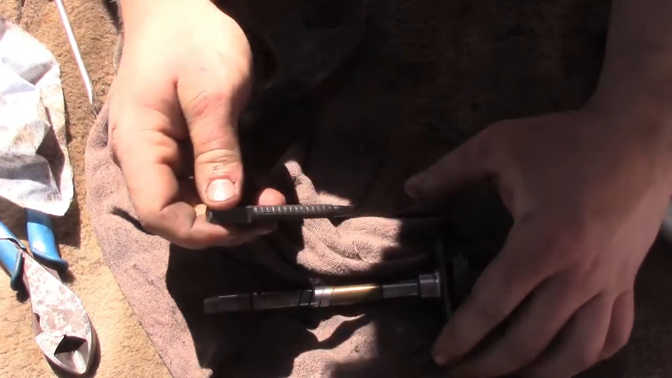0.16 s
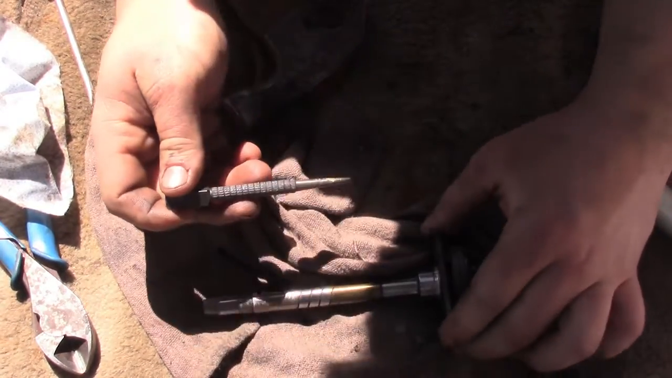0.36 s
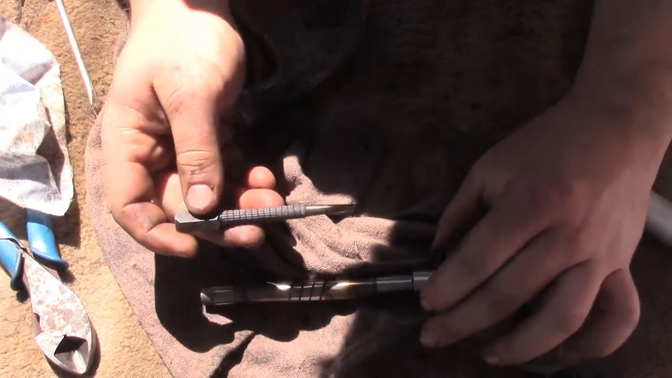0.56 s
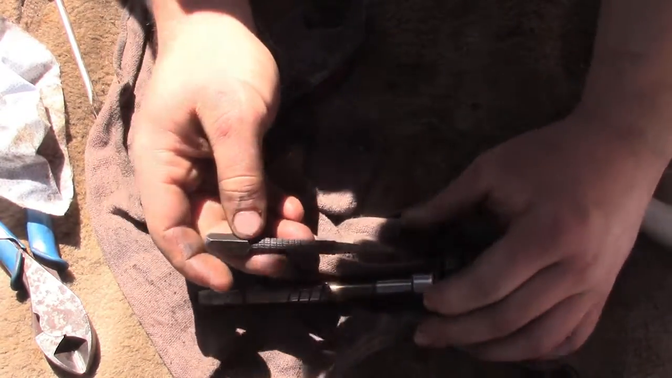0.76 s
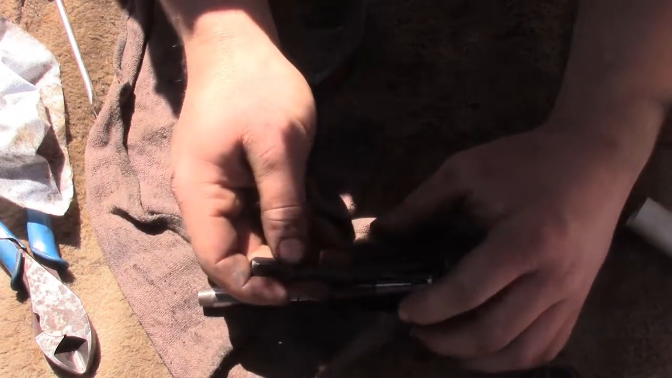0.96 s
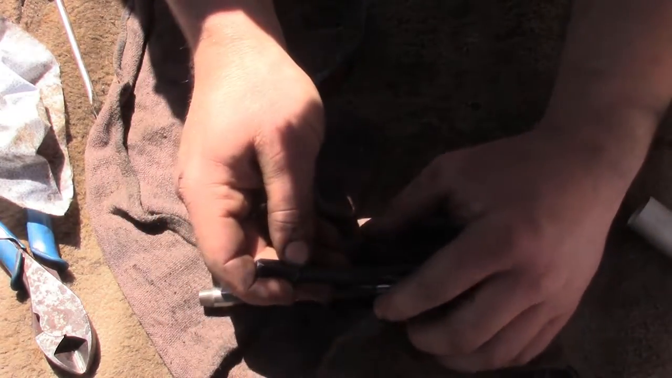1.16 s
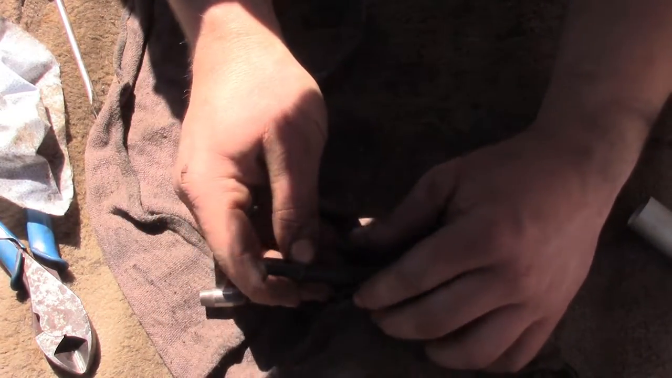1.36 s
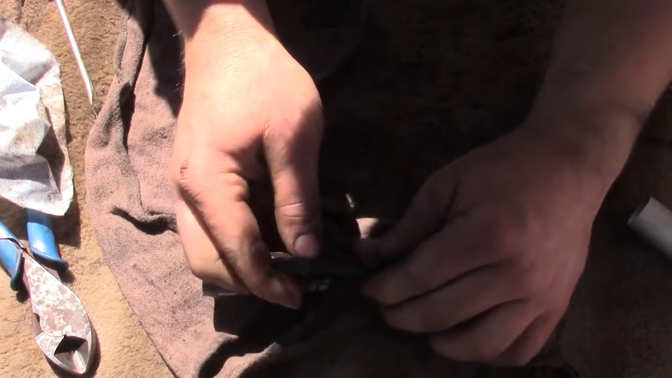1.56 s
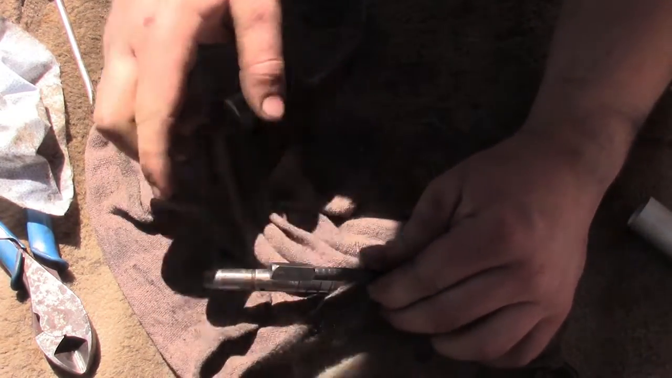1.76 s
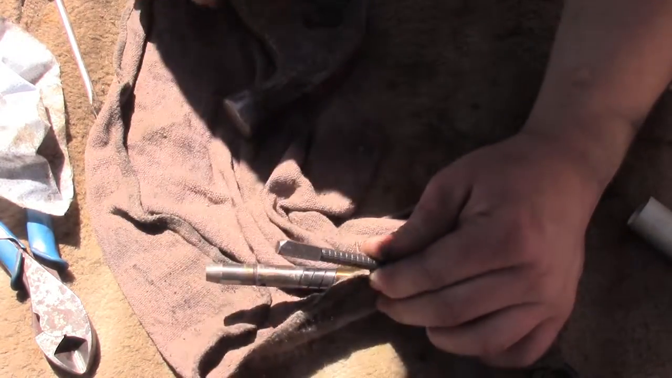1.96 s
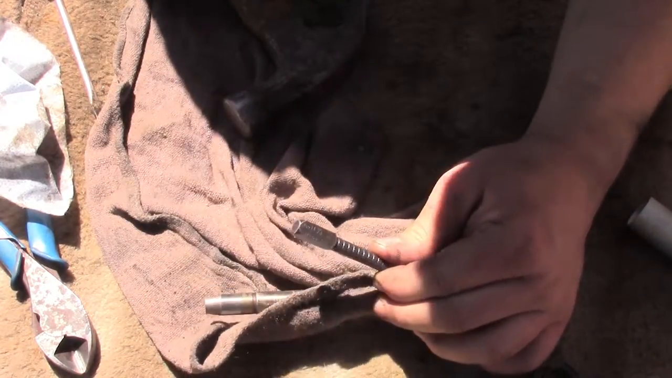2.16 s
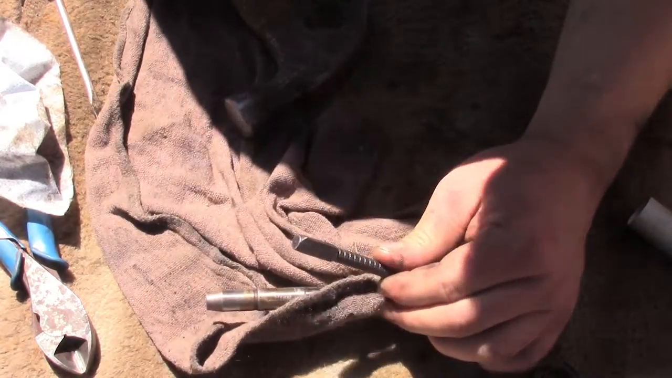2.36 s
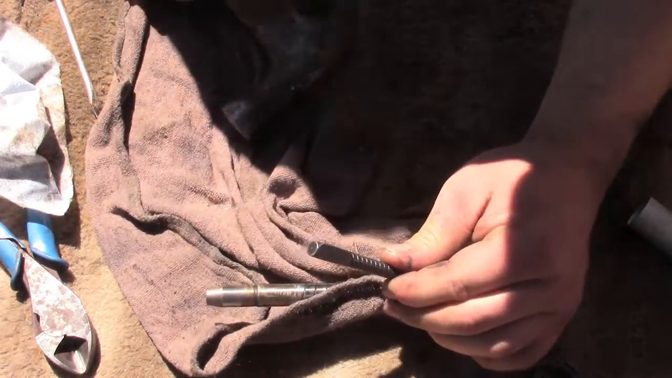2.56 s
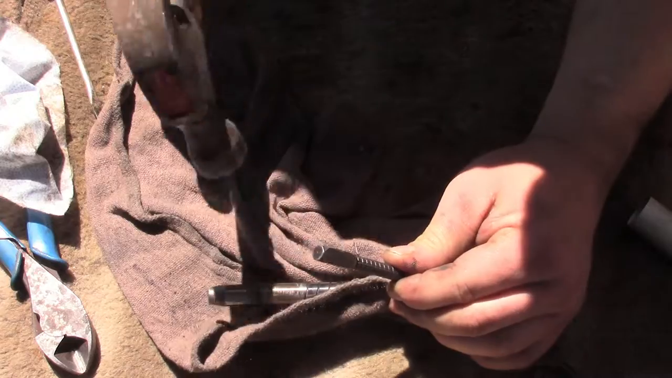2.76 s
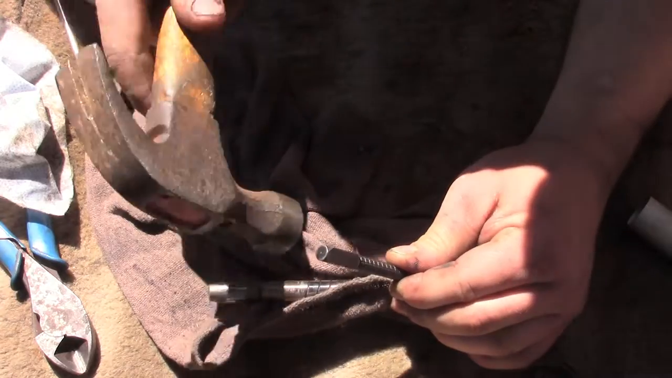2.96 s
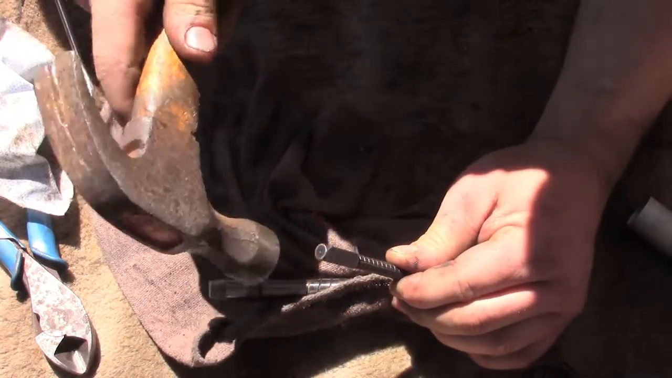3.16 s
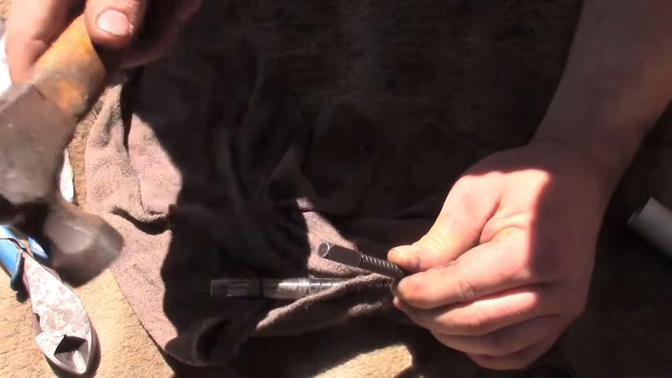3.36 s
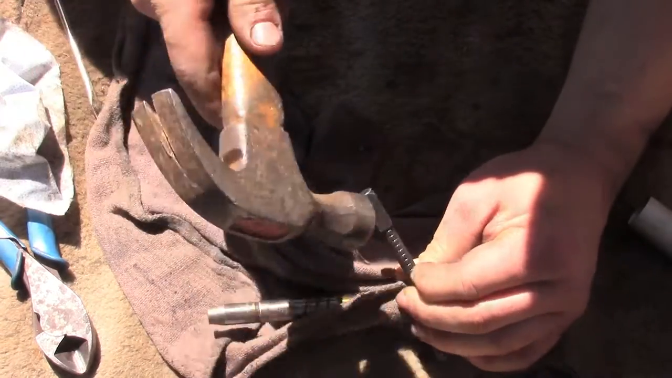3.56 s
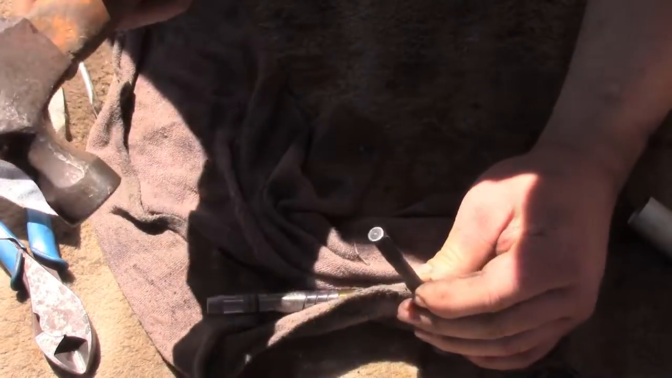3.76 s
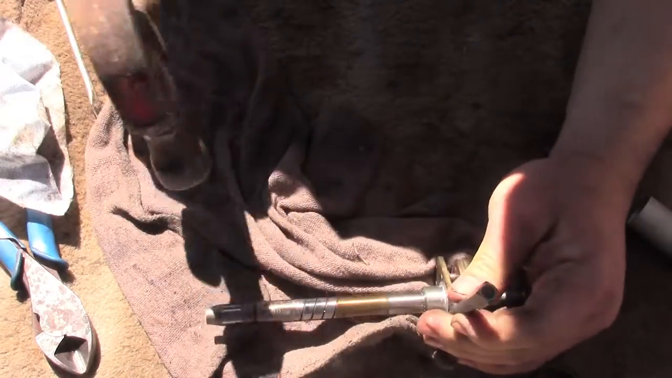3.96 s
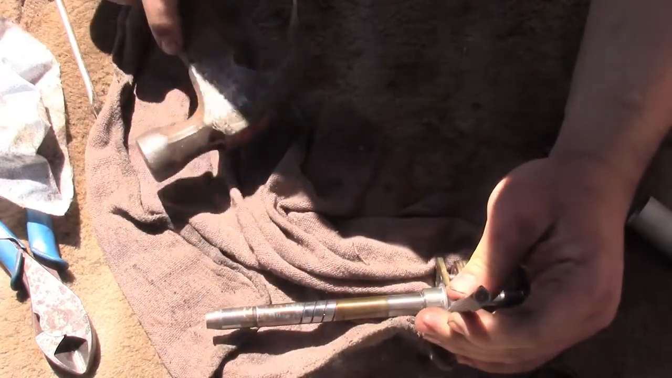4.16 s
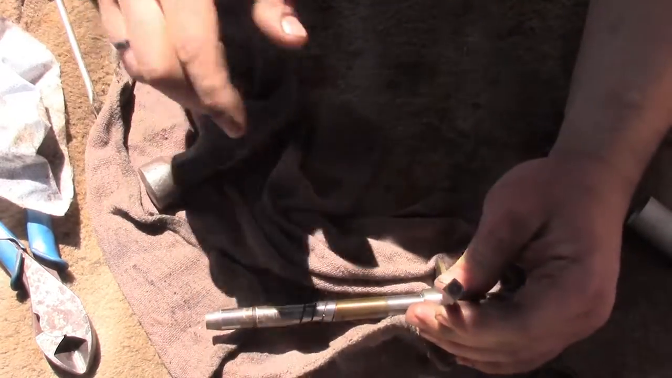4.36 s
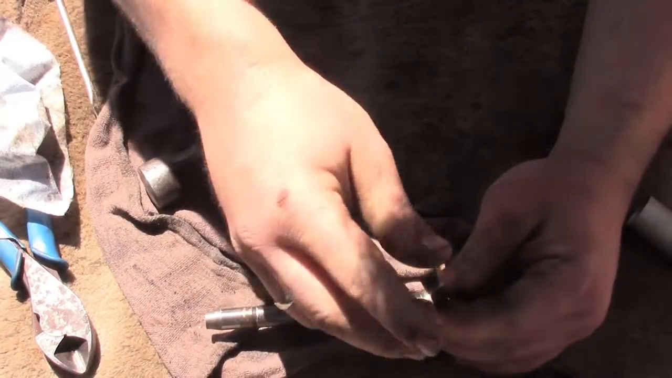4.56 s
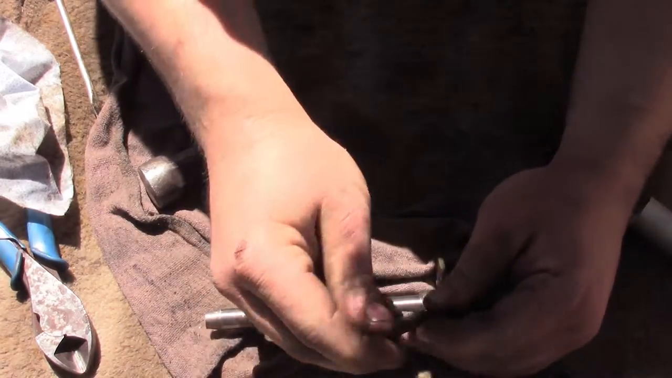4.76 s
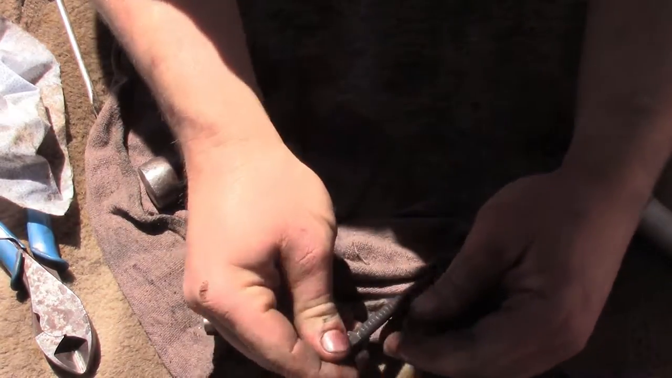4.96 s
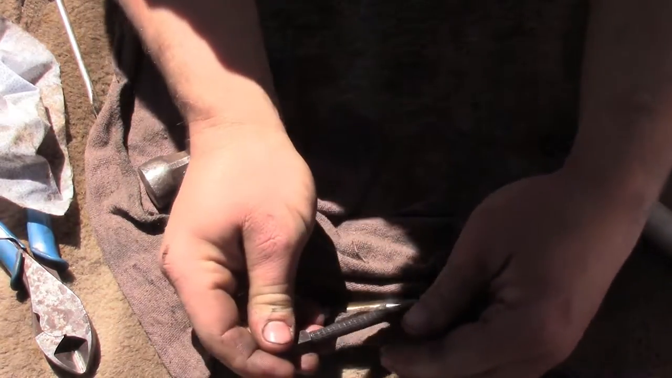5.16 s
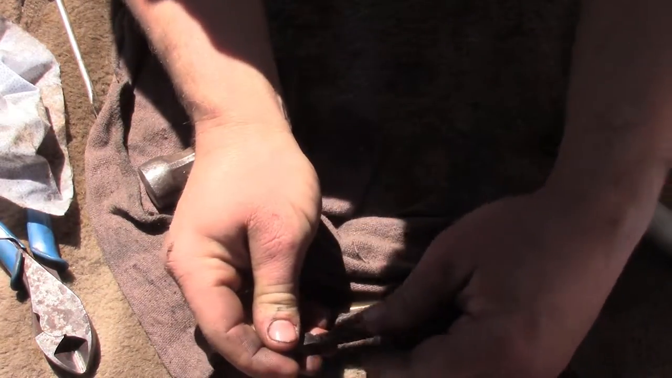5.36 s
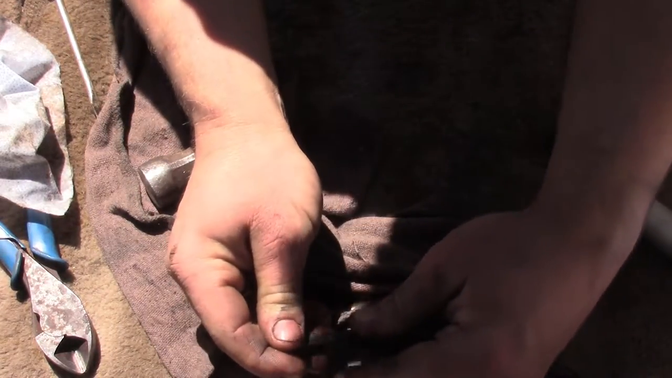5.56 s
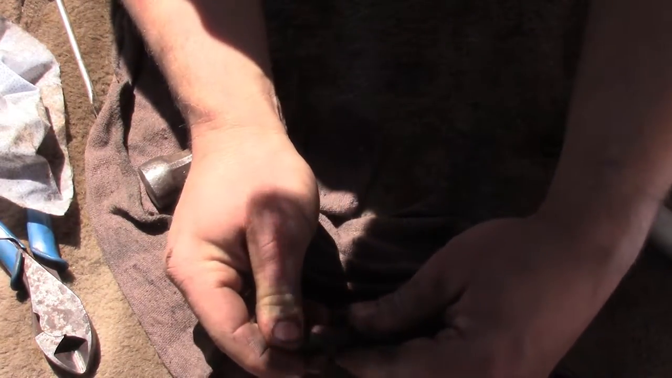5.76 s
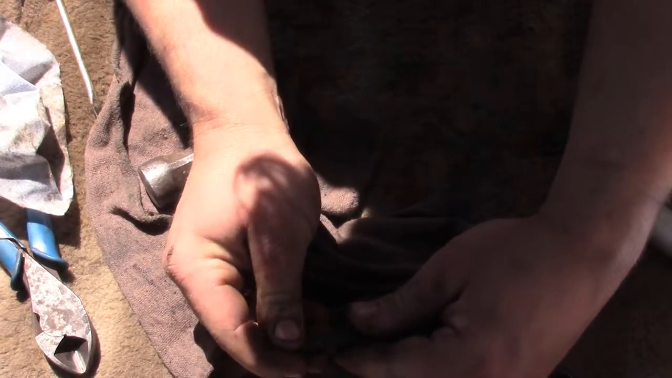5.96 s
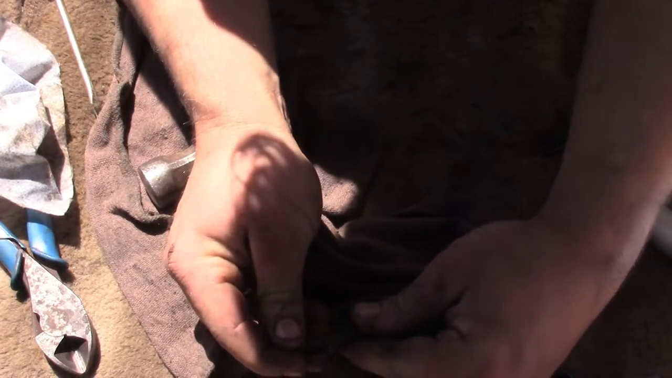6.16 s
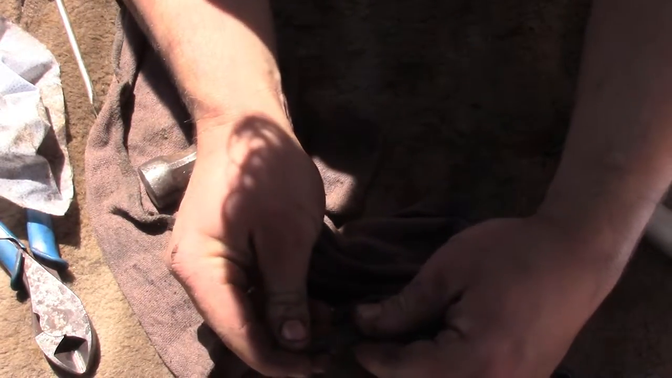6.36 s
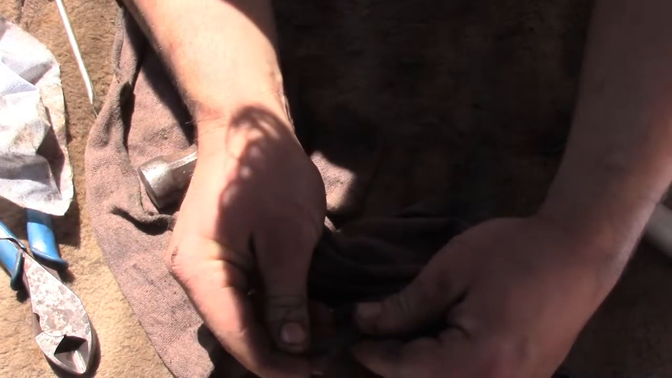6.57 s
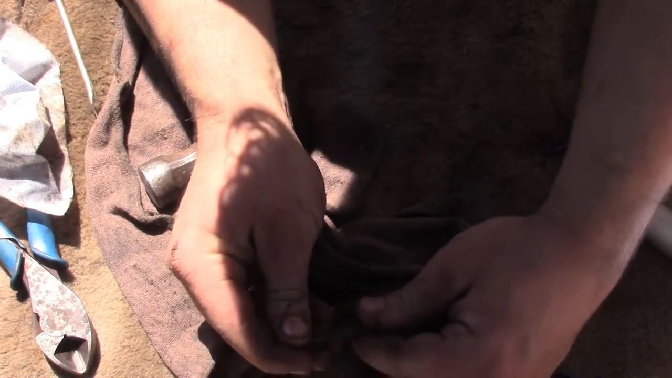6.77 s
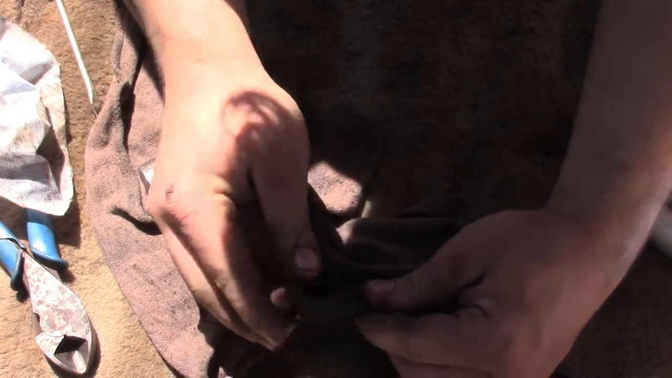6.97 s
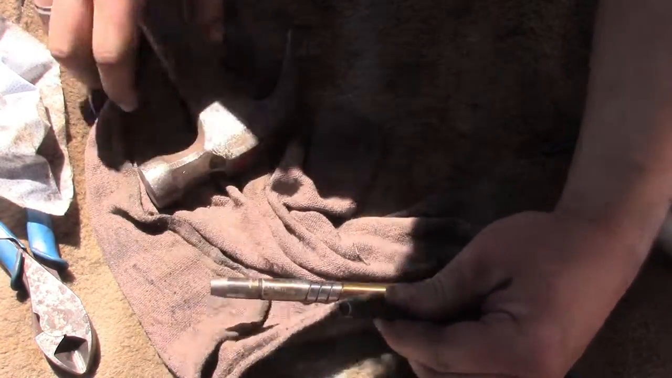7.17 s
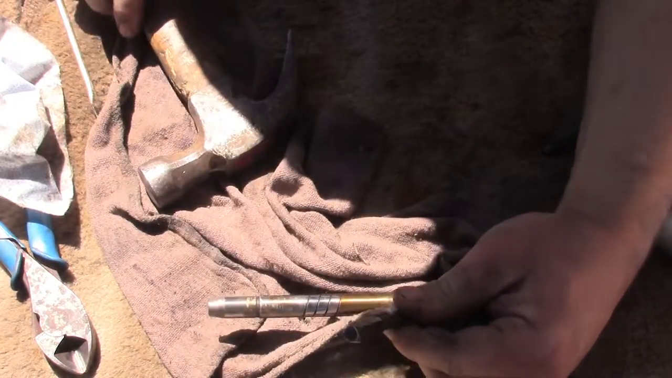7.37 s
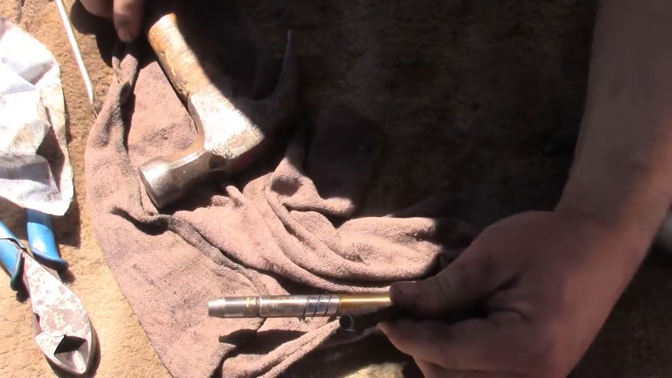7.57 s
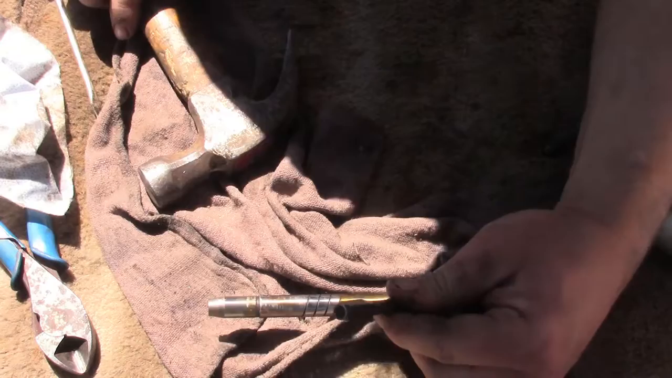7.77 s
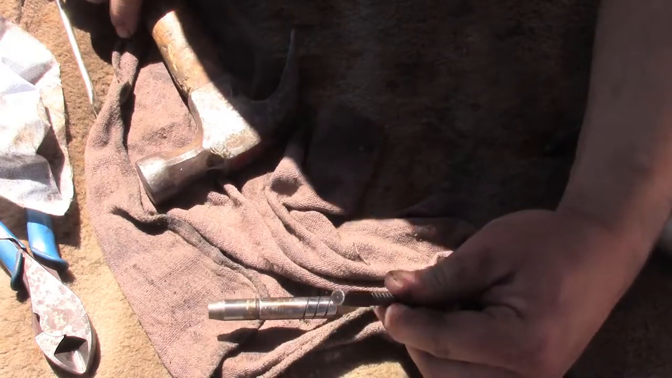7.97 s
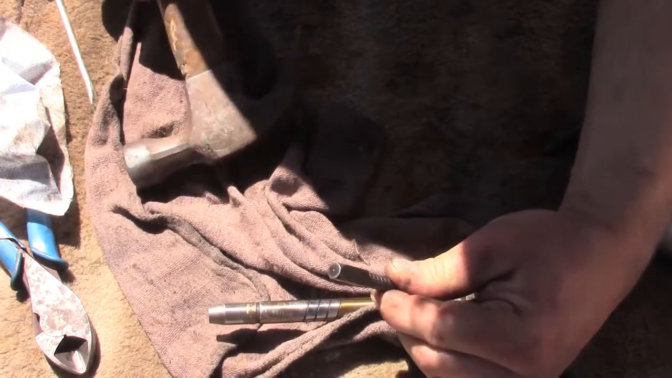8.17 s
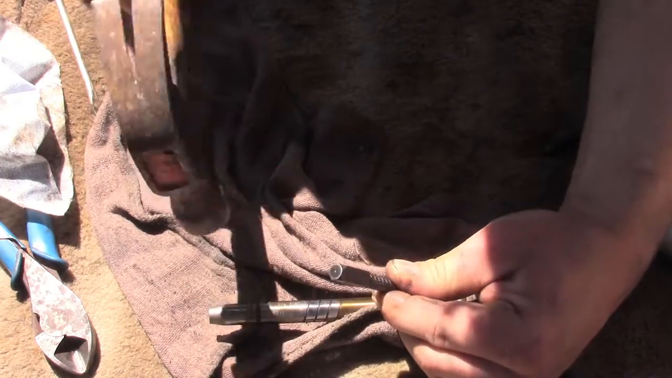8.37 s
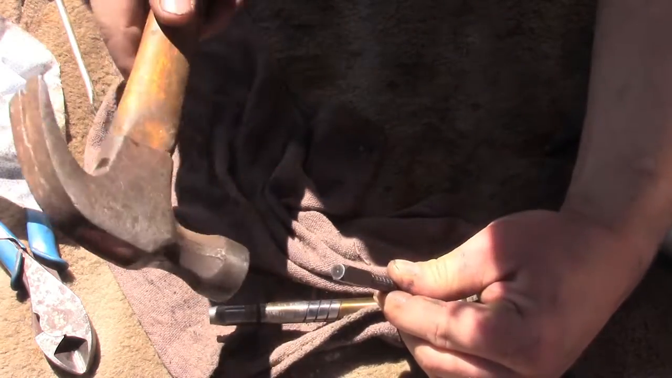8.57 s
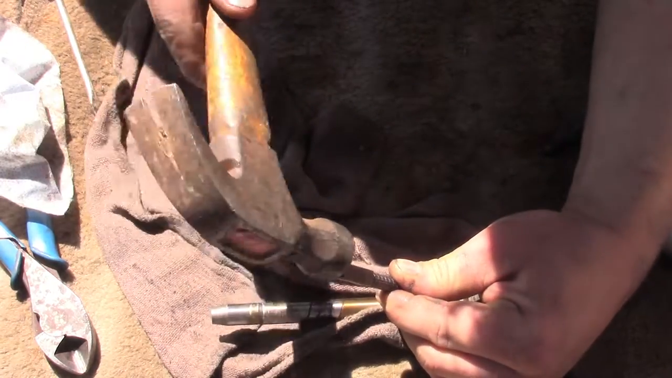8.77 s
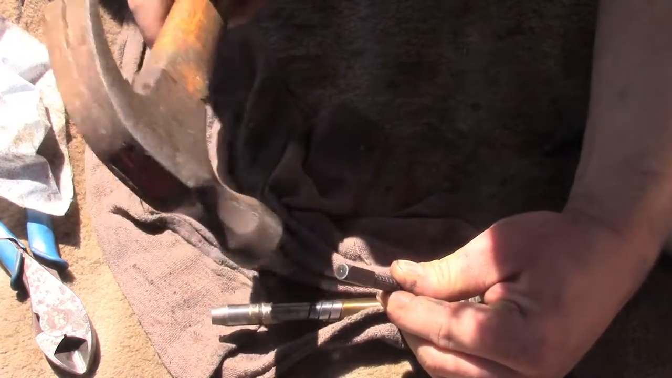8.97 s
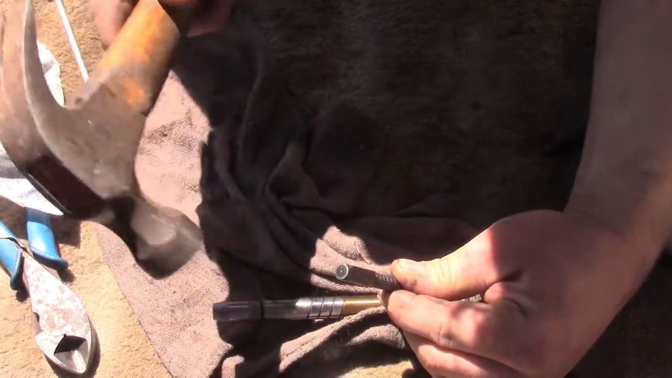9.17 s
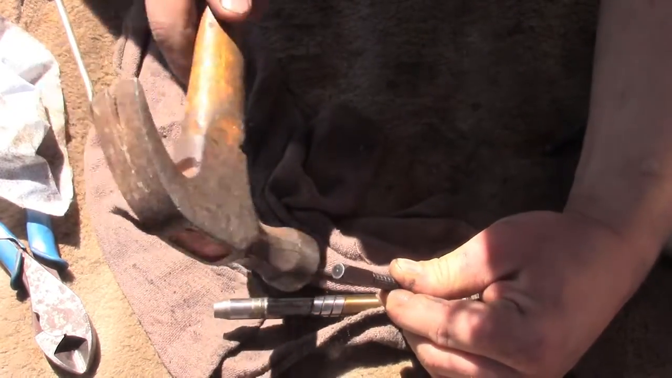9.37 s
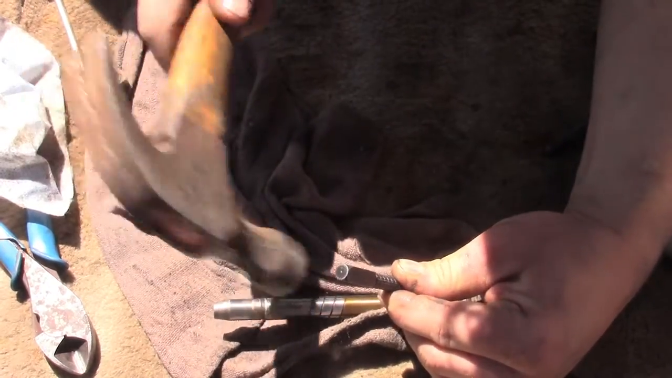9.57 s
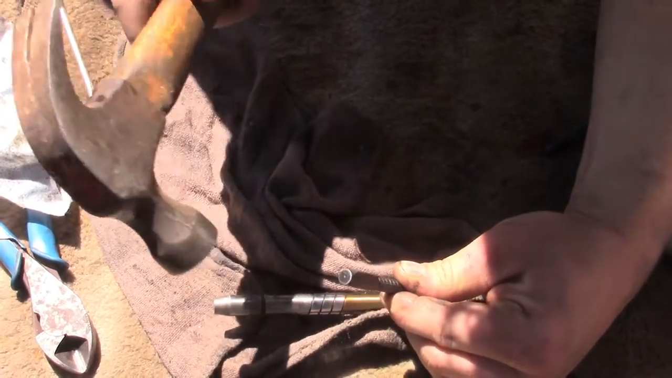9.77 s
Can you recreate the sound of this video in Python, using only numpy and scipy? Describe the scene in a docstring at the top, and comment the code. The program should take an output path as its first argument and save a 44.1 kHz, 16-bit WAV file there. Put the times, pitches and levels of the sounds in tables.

```python
"""Outdoors on a wooden deck, a hammer taps a small chisel against a steel sleeve lying on a rag.
Each blow makes hammer and chisel ring as fading tones, with a crack and a tail of noise; boards thud and rattle.
Parts clink (clicks and tones), rub or ring roughly (noise through resonances); cloth, skin and a part set down
give soft hiss. Behind it are distant traffic, a wash of noise with a wavering hum, and a faint quick ticking.
A low boom spreads under the last thuds, made by raising the level of the same wash and hum."""
import sys
import numpy as np
from scipy import signal
from scipy.fft import rfft, irfft
from scipy.io import wavfile
from scipy.ndimage import uniform_filter1d

SR = 44100
rng = np.random.default_rng(int(sys.argv[2]) if len(sys.argv) > 2 else 0)


def generate_wav(signal):
    """Clip the signal to [-1, 1] and save it as 16-bit WAV at the path in sys.argv[1]."""
    frames = np.transpose(np.atleast_2d(signal))
    scaled = np.clip(frames, -1, 1) * 32767
    pcm = np.round(scaled).astype(np.int16)
    wavfile.write(sys.argv[1], SR, pcm)


N = 433062  # length of the scene [samples]


def undb(db):
    """Turn decibels into a plain multiplier."""
    return 10 ** (np.asarray(db) / 20)


def unit(x):
    """Scale a sound to an average (rms) level of 1."""
    return x / np.sqrt(np.mean(x ** 2))


def band(x, hz, width_hz):
    """Two-pole resonance: favours sound near one pitch, with gain 1 at the centre."""
    return signal.lfilter(*signal.iirpeak(hz, hz / width_hz, SR), x)


def between(size, lo_hz, hi_hz):
    """Noise of rms 1 kept between a low and a high edge."""
    edges = signal.butter(2, [lo_hz, hi_hz], "band", fs=SR, output="sos")
    return unit(signal.sosfilt(edges, rng.standard_normal(size)))


def coloured(shape, size):
    """Noise of rms 1 whose spectrum follows points of (frequency [Hz], level [dB])."""
    hz, db = np.transpose(shape)
    f = np.maximum(np.arange(size // 2 + 1) * SR / size, 1)
    gain = undb(np.interp(np.log(f), np.log(hz), db))
    return unit(irfft(rfft(rng.standard_normal(size)) * gain, size))


def walk(rate):
    """Random levels of rms 1, gliding to a new value `rate` times a second."""
    k = int(SR / rate)
    steps = np.repeat(rng.standard_normal(N // k + 1), k)
    return unit(uniform_filter1d(steps, k)[:N])


def fade(t, t60):
    """Dying away by 60 dB in t60 seconds."""
    return 1000. ** (-t / t60)


def add(out, s, x):
    """Mix sound x into out, starting at s seconds."""
    i = int(s * SR)
    out[i:i + len(x)] += x[:max(N - i, 0)]


def background():
    """Distant traffic, a wash of noise with a wavering hum, and a low boom spreading under the last thuds."""
    # level and treble of the background; its last rise is the low boom:
    # (time [s], level [dB], level of its treble [dB])
    levels = [(0, -56.5, 5.5), (.9, -57, 7), (1.3, -60.5, 7.5), (2, -59, 7.5), (2.4, -60, 9),
              (3.1, -58, 4.5), (4.6, -57, 6), (4.9, -55, 8), (5.5, -57.5, 6.5), (6.101, -59, 6.5),
              (6.6, -57, 5), (7.3, -55.5, 5.5), (7.8, -55, 4.5), (8.3, -56.5, 8.5), (8.75, -54.5, 5.5),
              (9.82, -45.5, -2)]
    # spectrum of the wash: (frequency [Hz], relative level [dB])
    air = [(18, -49.5), (30, -18.5), (138, -6.5), (170, -2), (215, -5.5), (266, -2.5), (311, -7.5),
           (404, 0.5), (540, -7), (801, -9.5), (1100, -15.5), (1220, -15), (6900, -32.5), (16000, -47.5)]
    hum_hz, hum_width_hz, hum_db, hum_waver_db = 424, 24, -9, 4
    s, db, bright_db = np.transpose(levels)
    t = np.arange(N) / SR
    wash = coloured(air, N)
    dull = signal.sosfilt(signal.butter(2, 900, fs=SR, output="sos"), wash)
    treble = undb(np.interp(t, s, bright_db)) * (wash - dull)
    hum = unit(band(rng.standard_normal(N), hum_hz, hum_width_hz))
    hum = undb(hum_db + hum_waver_db * walk(18)) * hum
    mix = dull * undb(2.1 * walk(42)) + hum + treble
    return undb(np.interp(t, s, db)) * mix


def ticking():
    """A faint quick ticking: pulses of uneven, throbbing strength excite one resonance."""
    rate_hz, throb_hz, tick_hz, tick_db = 73, 26.2, 1790, -70.5
    pulses = np.zeros(N)
    at = np.arange(0, N, SR / rate_hz).astype(int)
    throb = 1 + 1.4 * np.cos(2 * np.pi * throb_hz * at / SR)
    pulses[at] = throb * undb(2 * rng.standard_normal(len(at)))
    return undb(tick_db) * unit(band(band(pulses, tick_hz, 250), tick_hz, 250))


def rustles_and_scuff():
    """Swells of broad hiss that flutter quickly: cloth, skin, and the scuff of a part set down."""
    # (start [s], length [s], level before flutter and swell [dB], treble tilt [dB per octave])
    hisses = [(0.137, 0.19, -56, -7), (0.505, 0.11, -55, -9.5), (0.718, 0.085, -47, -7),
              (0.902, 0.084, -46, -9), (1.009, 0.11, -54, -3.5), (1.36, 0.17, -67, -4),
              (2.172, 0.37, -62.5, -6.5), (2.42, 0.38, -61, -6.5), (2.674, 0.24, -62.5, -2),
              (2.881, .25, -59, -5), (3.709, 0.065, -46, -4), (3.78, 0.43, -60, -5),
              (4.231, 0.11, -49.5, -9), (4.397, 0.22, -52, -8.5), (4.701, 0.96, -61.5, -13.5),
              (5.274, 0.17, -62, -5), (5.432, 0.12, -53, -6), (5.556, 0.16, -64, -3.5),
              (7.046, 0.075, -44, -9), (7.165, 0.07, -48.5, -5.5), (7.209, 0.11, -49.5, -2),
              (7.947, 0.34, -61.5, -5), (8.104, 0.18, -59, -4), (8.474, .15, -57.5, -4.5)]
    swell_share = 0.21  # part of a hiss spent growing
    out = np.zeros(N)
    for start, length_s, db, tilt_db in hisses:
        size = int(length_s * SR) // 2 * 2
        ramp = np.interp(np.arange(size) / size, [0, swell_share, 1], [0, 1, 0])
        swell = np.sin(np.pi / 2 * ramp) ** 2
        shape = [(250, -21), (1000, -2.5), (10000, np.log2(10) * tilt_db), (16000, 4 * tilt_db - 18)]
        add(out, start, undb(db) * swell * coloured(shape, size))
    flutter = undb(1.63 * walk(90))
    return flutter * out


def rubs_and_rough_rings():
    """Rubs, and rough short rings of hammer and sleeve: gritty noise excites the resonances of a part."""
    # (start [s], end of the gritty noise [s], level [dB], part)
    rough_sounds = [(0.143, 0.17, -66, "shaft"), (0.212, 0.283, -77, "shaft"), (0.75, 0.753, -63, "shaft"),
                    (0.846, 0.96, -61.5, "shaft"), (1.027, 1.057, -62, "chisel"),
                    (2.038, 2.18, -62.5, "hammer"), (2.373, 2.545, -65.5, "hammer"),
                    (2.638, 2.69, -63, "hammer"), (2.717, 2.84, -62, "hammer"),
                    (2.906, 3.008, -63, "hammer"), (3.588, 3.629, -41, "sleeve"),
                    (3.632, 3.66, -55, "sleeve"), (4.411, 4.468, -49.5, "claw"),
                    (4.447, 4.542, -59, "claw"), (4.936, 5.01, -54, "chisel"),
                    (5.031, 5.145, -66.5, "chisel"), (5.122, 5.26, -58.5, "chisel"),
                    (5.315, 5.327, -66, "chisel"), (5.403, 5.509, -57.5, "chisel"),
                    (5.56, 5.629, -64, "chisel"), (7.039, 7.075, -40.5, "chisel"),
                    (7.144, 7.203, -71, "chisel"), (7.199, 7.359, -58, "chisel"),
                    (7.68, 7.82, -74.5, "collar"), (7.21, 7.337, -67, "collar"), (5.08, 5.2, -66, "collar"),
                    (7.862, 8.007, -71.5, "washer"), (7.982, 8.26, -74, "chisel"),
                    (7.056, 7.133, -51, "nut"), (7.188, 7.229, -49.5, "nut"), (4.851, 5.514, -61.5, "nut"),
                    (4.36, 4.497, -41.5, "handle")]
    # resonances of each part: (frequency [Hz], width [Hz], relative level [dB])
    parts = {"chisel": [(1546, 48, 4), (2575, 120, 3), (4040, 45, 3.5), (4600, 900, 0.5), (5040, 48, -3),
             (9010, 210, 10), (9900, 2200, -13.5), (11500, 100, -31)], "shaft": [(4600, 47, 3),
             (5820, 20, 5), (6170, 23, 2), (10400, 70, -9), (14500, 50, -14)], "hammer": [(1750, 90, -21),
             (2694, 57, 0), (3060, 55, -5), (4330, 350, -7.5), (5160, 92, -11)], "sleeve": [(4385, 50, 0),
             (5300, 60, -15), (10050, 80, -4), (13400, 80, -25)], "collar": [(4270, 60, 0.5),
             (5360, 69, -8)], "nut": [(1684, 76, 2)], "washer": [(2360, 27, 0)], "handle": [(188, 24, -2),
             (501, 9.2, 0)], "claw": [(1180, 37, 8), (1730, 23, 10.5), (2450, 280, 11.5), (4310, 160, 10),
             (4600, 140, 5), (4980, 70, -4.5), (6350, 120, 0.5)]}
    out = np.zeros(N)
    for start, end, db, part in rough_sounds:
        size = int((end - start) * SR)
        unevenness = np.repeat(rng.standard_normal(size // 300 + 1), 300)
        unevenness = uniform_filter1d(unevenness, 100)[:size]
        grit = rng.standard_normal(size) * undb(4.0 * unevenness) * signal.windows.tukey(size, .4)
        grit = np.pad(grit, (0, 2000))  # time to ring out
        ring = 0
        for hz, width_hz, mode_db in parts[part]:
            mode = band(band(grit, hz, width_hz), hz, 6 * width_hz)
            ring = ring + undb(mode_db) * mode / np.sqrt(width_hz)
        add(out, start, undb(db) * unit(ring))
    return out


def clinks():
    """Parts clink when handled, or when the hammer bounces after the last blow: a click and a rough ring."""
    # (time [s], click level [dB], click centre [octaves over 1 kHz], fall away from it [dB per octave],
    #  ring [Hz], ring level [dB])
    contacts = [(0.1888, -38, 0, 7.5, 2450, -46), (0.538, -42, 0, 9, 1900, -63),
                (0.9134, -25.5, .5, 10, 1725, -35.5), (0.9797, -37, 0, 6, 3080, -43.5),
                (1.023, -39.5, 3.5, 10, 3830, -50), (1.033, -49, 1, 2, 3830, -44),
                (1.069, -45, 0.2, 7, 2000, -48), (1.184, -56, 2.5, 8, 1760, -67),
                (1.2729, -57, 2.8, 4, 3870, -68), (1.3566, -29.5, 1.8, 14, 3386, -27.5),
                (1.5848, -29, -1.5, 3.5, 1740, -43.5), (2.09, -42.5, 2.5, 0.5, 1940, -47),
                (2.2161, -48, 0.2, 3.5, 3200, -60), (2.643, -73, 7, -1, 2640, -52),
                (3.7229, -35, 2, 5, 4150, -43), (3.735, -41, 4, 0, 3270, -51),
                (3.8223, -43.5, -2.5, 1.5, 2070, -55), (3.9165, -58, 6, 2, 3910, -42.5),
                (4.338, -40.5, 0.46, 8, 1750, -61), (4.407, -50, 1, 10, 2470, -50),
                (4.6582, -55, 3.5, 12, 4220, -52), (4.957, -47, 3, 12, 3780, -59),
                (4.972, -44, 2.5, 6, 3810, -46), (4.9798, -41, 3, 13, 3740, -47),
                (5.017, -30.5, 1.5, 11.5, 3660, -38), (5.0684, -39, 0, 6.5, 3890, -34),
                (5.149, -43, 3.5, 4, 1700, -58), (5.209, -48, 4, 5, 4040, -55),
                (5.264, -43.5, .5, 10, 2070, -48), (5.3052, -45, 1.9, 0, 3810, -39),
                (5.441, -57.5, 7, 3, 3900, -49), (5.5904, -54, 1.7, 1, 3920, -45.5),
                (6.605, -47.5, -3.5, 0.5, 3900, -48), (7.0481, -32, 2, 5.5, 3835, -41.5),
                (7.0628, -25.5, 1.7, 3.5, 1800, -30), (7.1023, -40.5, 2, 13, 5320, -42.5),
                (7.151, -47, .3, 5, 1860, -55), (7.192, -29.5, -3.2, -0.5, 3760, -33),
                (7.205, -25.5, 3, 5, 1860, -37), (7.3563, -55, -2, 9, 3890, -46),
                (7.3668, -49, 2.2, 7, 3460, -55), (7.455, -57.5, 4, 5, 1810, -62),
                (7.5457, -57, 0, 0, 3870, -56), (7.635, -66, 2.4, 8, 5400, -61),
                (7.8044, -45.5, -1, 11, 2210, -69), (9.691, -24.5, 0.5, 5.5, 2490, -35)]
    # bands of noise in a click: (low edge [Hz], high edge [Hz], relative level [dB])
    click_bands = [(463, 1590, -1), (1480, 4050, -3.5), (3950, 7060, -2.5), (8200, 10000, -3.5),
                   (11700, 13300, -10.5)]
    # partials of a ring: (multiple of its pitch, relative level [dB])
    rod_partials = [(1, -0.5), (2.33, -11)]
    sleeve_partials = [(.58, -9.5), (.74, -9.5), (1, 4.5), (1.3, -9.5), (1.6, -17)]
    click_t60_s, rise_s = 0.066, 0.00018
    roughness, ring_t60_share, partial_top_hz = .7, .9, 10000
    out, t = np.zeros(N), np.arange(SR // 4) / SR
    for s, click_db, centre, fall_db, ring_hz, ring_db in contacts:
        click = 0
        for lo, hi, db in click_bands:
            octaves = np.log2(np.sqrt(lo * hi) / 1000)
            gain = undb(click_db + db - abs(fall_db * (octaves - centre)))
            dying = fade(t, click_t60_s * (lo / 1500) ** -.12)  # treble dies first
            click = click + gain * between(len(t), lo, hi) * dying
        # the sleeve rings in a range of its own
        partials = sleeve_partials if 3000 < ring_hz < 3650 else rod_partials
        ring = np.zeros(len(t))
        for k, db in partials:
            hz = k * ring_hz
            if hz < partial_top_hz:
                tone = np.sin(2 * np.pi * hz * t)
                rough = roughness * between(len(t), hz - 200, hz + 200)
                ring += undb(ring_db + db) * (tone + rough)
        sound = click + ring * fade(t, ring_t60_share * click_t60_s)
        add(out, s, sound * np.minimum(t / rise_s, 1))
    return out


def blows():
    """Hammer on chisel: ringing steel roughened by chatter, a brief crack and a scattered tail of noise."""
    # (time [s], levels of the six lower groups of steel tones from low to high [dB] x 6,
    #  tail level [dB], damping by the grip [times faster fading])
    strikes = [(3.266, -28.5, -15.5, -14, -2.5, -8, -15, -37, 1.39),
               (3.549, -25.5, -24, -11.5, -10, -12, -10, -27, 1.14),
               (8.8003, -54, -13.5, -37, -25, -3, -4.5, -32.5, 1.46),
               (9.0696, -26.5, -21.5, -28, -17.5, -31, -14.5, -39.5, 1.11),
               (9.3558, -29, -26, -42, -16, -37, -10, -37, 1.18),
               (9.6425, -25.5, -16.5, -30, -11, -13, -21, -38.5, 1.03)]
    # hammer and chisel, in seven groups of tones; each blow mixes the lower six its own way:
    # (frequency [Hz], relative level [dB], time to fade by 60 dB before the grip damps it [s])
    steel = [
        [(2000, -5.5, .1), (2750, -21, 2.1), (2850, -2, 0.13), (2930, -8, 0.39), (3472, -9, .1),
         (3740, -15, 0.076)],
        [(4385, 0, .2), (4620, -11, .13)],
        [(5040, 0, .12), (5140, -2, .11), (5400, -6, .12)],
        [(5712, 0, .125), (5922, -10, .14), (6390, -16, .1), (6480, -19, .11)],
        [(7330, -14, .12), (7700, -18, .1), (8188, 0, .11)],
        [(8575, 0, .12)],
        [(9900, -5.5, .08), (10200, -7, 0.072), (11600, -3, 0.066), (13000, -6, .06), (14200, -15, .05)],
    ]
    # spectrum of the crack: (frequency [Hz], relative level [dB])
    crack_shape = [(470, -31.5), (800, -9), (1520, -25.5), (3220, -6.5), (5580, -11.5), (6740, -11.5),
                   (8440, 2), (11600, -24.5), (13300, -11.5), (16000, -46)]
    # scattered tail: (centre of band [Hz], relative level [dB], time to fade by 60 dB before the grip [s])
    scatter = [(1460, -3, .3), (2000, 7.5, 0.12), (3000, 2.5, 0.32), (4003, 1, 0.16), (5626, 11.5, 0.2),
               (8000, -6, 0.22), (10590, -9, 0.45), (13500, -11, .2)]
    chatter_share, chatter_width_hz, top_group_db = .33, 123.1, -32.5
    crack_db, crack_t60_s, rise_s = -3.5, .019, .0007
    choke_s, free_share, choked_share = .08, .19, 0.51  # choke_s is shortened by the grip
    out, t = np.zeros(N), np.arange(SR // 2) / SR
    for s, *group_db, tail_db, grip in strikes:
        ring = 0
        for modes, share_db in zip(steel, [*group_db, top_group_db]):
            for hz, db, t60 in modes:
                tone = np.sin(2 * np.pi * (hz * t + rng.random()))
                chatter = unit(band(rng.standard_normal(len(t)), hz, chatter_width_hz))
                rough_tone = tone + chatter_share * chatter
                ring = ring + undb(db + share_db) * fade(t, t60 / grip) * rough_tone
        crack = undb(crack_db) * coloured(crack_shape, len(t)) * fade(t, crack_t60_s)
        tail = 0
        for hz, db, t60 in scatter:
            hiss = between(len(t), hz / 1.2, hz * 1.2)
            tail = tail + undb(db + tail_db) * fade(t, t60 / grip) * hiss
        # the fingers close on the chisel again and choke the tail and most of the ring
        choke = np.exp(-(t * grip / choke_s) ** 2)
        sound = crack + (free_share + choked_share * choke) * ring + choke * tail
        add(out, s, sound * np.minimum(t / rise_s, 1))
    return out


def rattle(t):
    """Loose boards knock on after a thud: uneven dull pulses, peak near 1, that die away."""
    gap_s, hz, width_hz, t60_s = .021, 258, 190, 0.579
    gap, size = rng.standard_normal((40, 2)).T
    times_s = np.cumsum(gap_s * np.exp(.35 * gap))
    pulses = np.zeros(len(t))
    pulses[(times_s * SR).astype(int) % len(t)] = undb(4.5 * size)
    knocks = band(band(pulses, hz, width_hz), hz, width_hz)
    return knocks * SR / (np.pi * width_hz) * fade(t, t60_s)


def thuds():
    """Thuds into the boards: a hollow knock, then a rumble of board tones, bass building last, and a rattle."""
    # (time [s], knock level [dB], knock pitch [Hz], boards level [dB], extra bass of the boards [dB])
    hits = [(3.266, -10, 502, -39, 0), (3.549, -0.5, 434, -23.5, -4.5), (3.603, -11.5, 384, -45, -2),
            (4.249, 5, 319.6, -24, -2), (4.263, 2, 243.5, -29, -1.5), (4.308, -9, 189, -47, -4),
            (4.34, -4, 325, -36, -7), (4.373, -18, 443, -49.5, 2), (7.046, -16.5, 542, -55.5, 3.5),
            (7.191, -29.5, 614, -56, 1.5), (7.454, -34.5, 600, -64.5, 1.5), (8.802, -1.5, 295, -32.5, -2.5),
            (9.069, 1, 541.6, -20, -4.5), (9.356, 1, 579, -17.5, -3), (9.644, 3.5, 572.5, -17, -3)]
    # tones of the boards: (frequency [Hz], width of its shake [Hz], relative level [dB],
    #  time to fade by 60 dB [s])
    deck = [(81, 28, -11.5, 1.0), (112.8, 12, -1.5, 0.79), (161.7, 160, 2, 0.56), (188.9, 64, -12.5, 0.7),
            (244.3, 58, 0.5, 0.41), (281, 110, -4, 0.41), (319.3, 12, -1, 0.3), (400.2, 18, 7.5, 0.28),
            (490, 50, -7.5, 0.33), (556, 54, -0.5, 0.23), (639.6, 220, 7, 0.09), (838, 100, -10, 0.24),
            (1084, 410, -18, 0.27)]
    # tones in a knock: (multiple of its pitch, share)
    knock_shape = [(0.549, 0.45), (0.749, 0.37), (1, 0.99), (1.25, .6), (1.748, .25), (2.4, 0.057)]
    knock_t60_s, knock_rise_s = 0.04, .0017
    bass_hz, rattle_db = 200, 9.5  # bass lies below bass_hz; the rattle is relative to the boards
    out, t = np.zeros(N), np.arange(3 * SR // 2) / SR
    dull = signal.butter(4, [68, 1600], "band", fs=SR, output="sos")
    for s, knock_db, knock_hz, boards_db, bass_db in hits:
        rise = (1 - np.exp(-t / knock_rise_s)) ** 2
        knock = 0
        for k, share in knock_shape:
            knock = knock + share * np.sin(2 * np.pi * (k * knock_hz * t + rng.random()))
        knock = undb(knock_db) * rise * fade(t, knock_t60_s) * knock
        rumble = 0
        for hz, width_hz, db, t60 in deck:
            tone = np.sin(2 * np.pi * (hz * t + rng.random()))
            shake = band(rng.standard_normal(len(t)), hz, width_hz)
            shake = unit(band(shake, hz, 2 * width_hz))
            builds = 1 - np.exp(-t / (0.0035 + 1.7 / hz))
            gain = undb(db + (bass_db if hz < bass_hz else 0))
            rumble = rumble + gain * builds * fade(t, t60) * (tone + 0.95 * shake)
        boards = undb(boards_db) * (rumble + undb(rattle_db) * rattle(t))
        add(out, s, signal.sosfilt(dull, knock + boards))
    return out


def scene():
    """All the sounds added together, as one channel."""
    steady = background() + ticking()
    small_sounds = rustles_and_scuff() + rubs_and_rough_rings() + clinks()
    hammering = blows() + thuds()
    return (steady + small_sounds + hammering)[None]


def record(dry):
    """The microphone drops the deep bass, rounds the loudest peaks and cuts the top."""
    top_hz = 16250
    x = signal.sosfilt(signal.butter(3, 55, "high", fs=SR, output="sos"), dry)
    x = x / (1 + np.abs(x) ** 4) ** .25
    return signal.sosfilt(signal.ellip(14, .2, 120, top_hz, fs=SR, output="sos"), x)


dry = scene()
out = record(dry)
generate_wav(out)
```